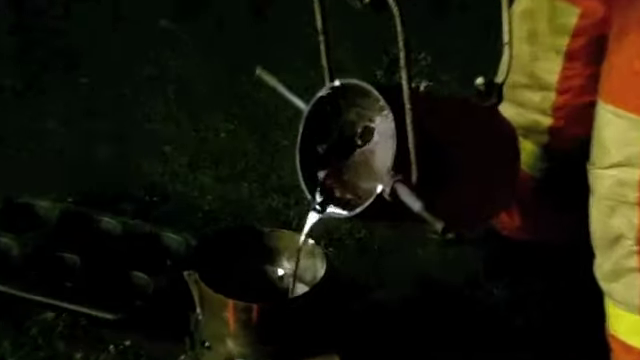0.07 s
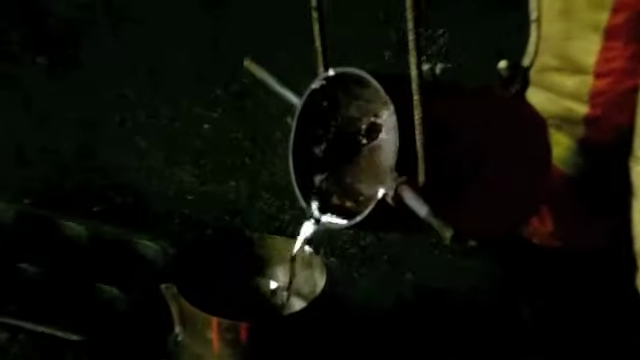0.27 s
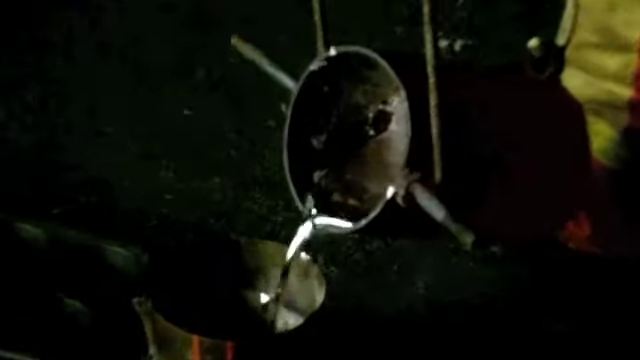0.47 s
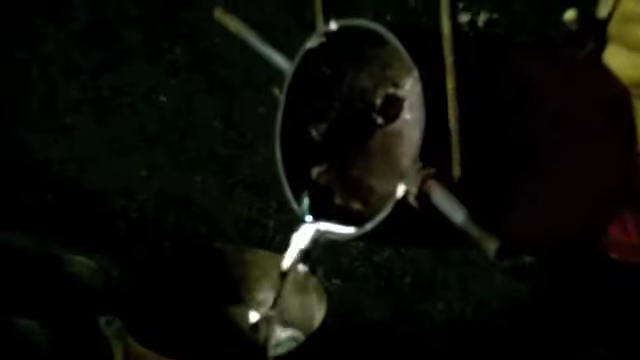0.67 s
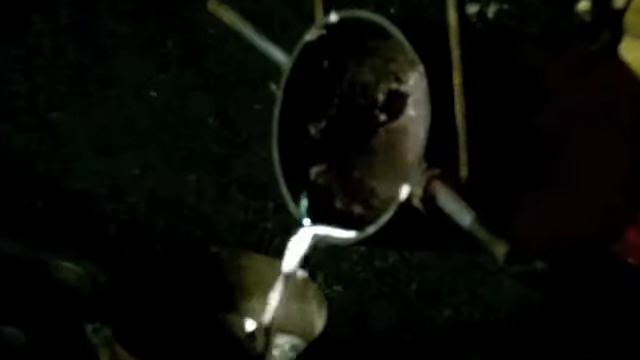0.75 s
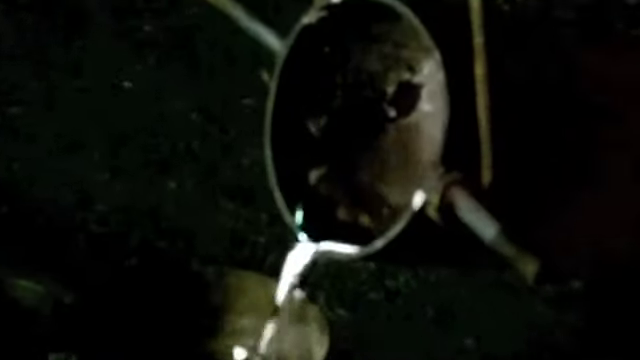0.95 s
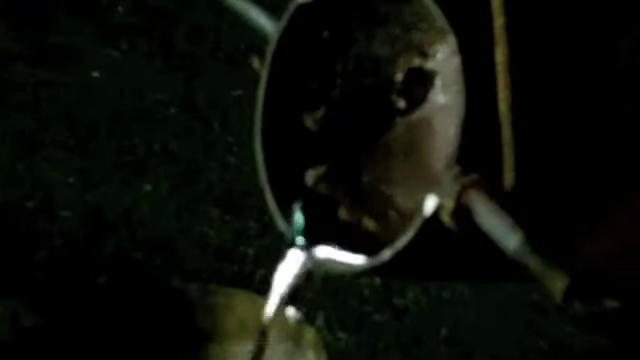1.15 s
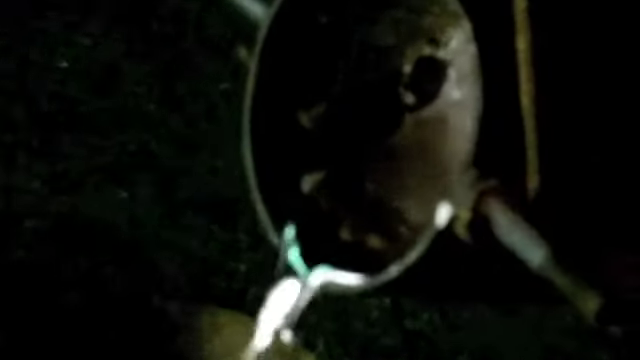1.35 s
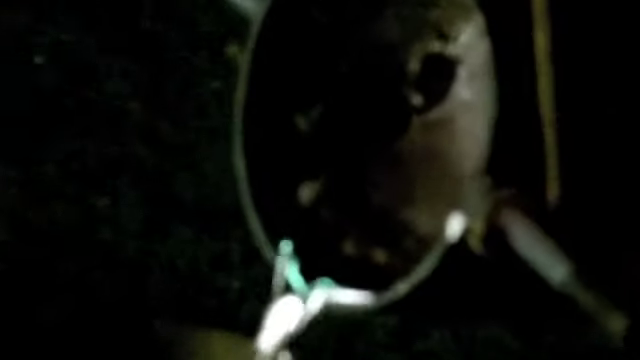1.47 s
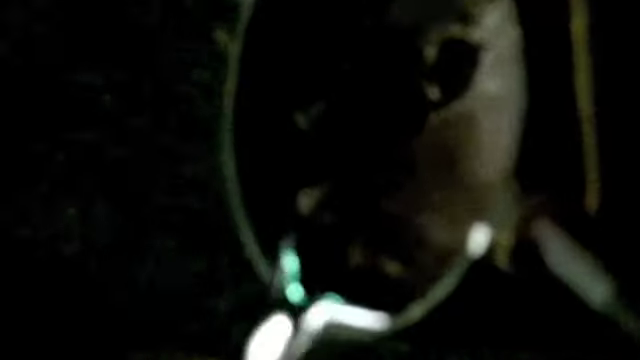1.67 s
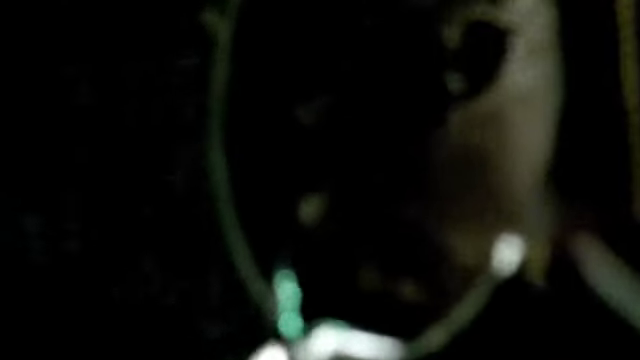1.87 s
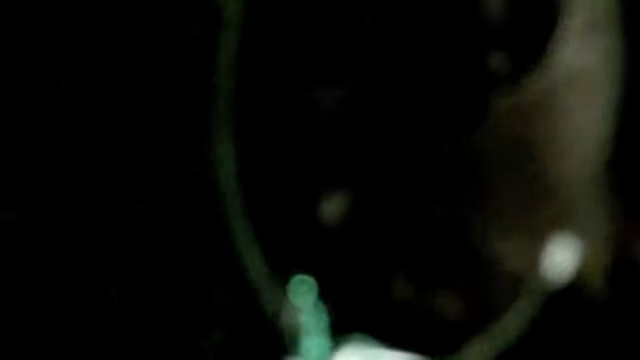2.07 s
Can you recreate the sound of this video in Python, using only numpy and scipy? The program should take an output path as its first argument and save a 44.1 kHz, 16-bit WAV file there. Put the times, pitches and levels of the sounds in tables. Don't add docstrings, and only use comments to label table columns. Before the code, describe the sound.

Molten metal pours with a dense, bright, steady hiss throughout, swelling slightly around 0.3 seconds and then easing. At about 0.2 to 0.3 seconds, tongs rattle quickly on the steel mould, leaving a short hollow mid-pitched note. Small ticks follow near 0.44, 0.5 and 0.63 to 0.7, then sparse spits and a plop around 1.5. Faint low stream wash and distant machine drone lie beneath, outdoors, in coloured mono.

```python
import sys
import numpy as np
from scipy import signal
from scipy.fft import rfft, irfft, next_fast_len
from scipy.io import wavfile
from scipy.ndimage import uniform_filter1d

SR = 44100
rng = np.random.default_rng(int(sys.argv[2]) if len(sys.argv) > 2 else 0)


def unload_audio(sound):
    columns = np.transpose(np.atleast_2d(sound))
    steps = np.round(np.clip(columns, -1, 1) * 32767)
    wavfile.write(sys.argv[1], SR, steps.astype(np.int16))


def boost_factor(decibels):
    exponent = np.asarray(decibels, float) / 20
    return 10 ** exponent


N = 92610

# centre in Hz, width in Hz, level in dB.
DRONE_BANDS = [(132.6, 5, -78.5), (203.5, 13, -76.5)]
# frequency in Hz, density in dB per Hz.
WASH_COLOUR = [(30, -34.5), (85, -42), (135, -7), (260, -5.5), (600, 1), (1400, -0.5), (1900, -4.5),
               (4000, -46)]
# frequency in Hz, level in dB, t60 in seconds.
HOLLOW_MODES = [(436, -41, .8), (415, -45, .7), (452, -49, .5)]
# frequency in Hz, level in dB, t60 in seconds.
MOULD_MODES = [(640, -4.5, 0.19), (639, -4.5, 0.091), (904, 6.5, 0.033), (1024, -3, 0.059),
               (1810, 4.5, 0.04), (1920, -9, 0.061), (2430, 0, 0.26), (3540, -6, 0.17), (4020, 0, 0.084),
               (4240, 4, 0.053), (4540, -20, 0.074), (4617, -16, 0.095), (4800, -2, 0.067)]
# start in seconds, crack in dB, crack centre in Hz, body ring in dB, bright ring in dB.
TONG_BLOWS = [
    (.186, -44, 2500, -60, -70),
    (.198, -41, 1500, -46, -70),
    (.205, -37, 3000, -50, -70),
    (.2160, -31, 2300, -36, -70),
    (.2385, -26, 4100, -40, -41),
    (.258, -40, 5200, -54, -54),
    (.271, -38, 1500, -50, -54),
    (.293, -44, 4200, -56, -52),
]
# start in seconds, peak
# in dB, pitch in Hz, t60 in seconds.
PING_EVENTS = [(.2005, -39, 600, .04), (.2020, -39, 990, .04), (.2035, -37, 2700, .012),
               (.2062, -30, 3850, .012), (.2100, -38, 3000, .012), (.2150, -62, 45, .12),
               (.2175, -31, 950, .06), (.2180, -26, 3750, .016), (.2185, -27, 1830, .025),
               (.2195, -27, 1930, .02), (.2300, -34, 930, .05), (.2375, -29, 1020, .04),
               (.2390, -23, 4200, .03), (.2405, -28, 2900, .014), (.2410, -31, 1900, .02),
               (.2425, -30, 5500, .014), (.2470, -35, 630, .08), (.2540, -34, 4650, .03),
               (.2740, -36, 4700, .035), (.4355, -37, 950, .014), (.4383, -36, 620, .012),
               (.4435, -40, 520, .014), (.4981, -31, 3200, .005), (.4984, -36, 4100, .006),
               (.4996, -36, 1350, .016), (.5003, -34, 620, .024), (.5010, -41, 1900, .012),
               (.5010, -47, 230, .05), (.5022, -38, 950, .02), (.6323, -24, 3300, .003),
               (.6323, -34, 9000, .003), (.6403, -34, 3200, .005), (.6498, -35, 8800, .004),
               (.6650, -43, 420, .03), (.6794, -33, 3100, .003), (.7051, -27, 3000, .003),
               (.7052, -34, 8000, .005), (.7064, -31, 4800, .003), (1.5182, -36, 640, .02),
               (1.5184, -35, 1050, .014), (1.5188, -39, 1500, .016), (1.5185, -45, 2700, .007),
               (1.5215, -44, 420, .025), (1.5968, -39, 1500, .013), (1.5968, -44, 3200, .006),
               (1.9505, -39, 2400, .004)]
# start in seconds, level in
# dB, centre in Hz, length in seconds, width in octaves.
SPIT_EVENTS = [(.2165, -35, 6900, .003, .1), (.2185, -33, 4700, .0055, .1), (.6862, -42, 7900, .006, .25),
               (.6865, -45, 3500, .005, .6), (.545, -43, 4500, .002, .5), (.664, -49, 450, .010, 1.2),
               (.985, -51, 1300, .006, .7), (1.213, -42, 3500, .001, 1.2), (1.230, -45, 6000, .002, .8),
               (1.265, -50, 900, .008, 1.1), (1.426, -46, 6000, .002, .8), (1.480, -46, 7000, .002, .6),
               (.186, -43, 1800, .030, .8), (.206, -42, 1600, .030, .8), (.245, -44, 1500, .030, .9),
               (.283, -50, 1500, .030, 1.0), (.300, -47, 4600, .030, .4), (.330, -49, 4300, .030, .4)]
# time in seconds, level in dB.
FIZZ_LEVEL = [
    (0.0, -42.5),
    (0.33, -40.5),
    (0.76, -43.5),
    (1.84, -45),
    (2.1, -45),
]
# frequency in Hz, density in dB per Hz.
FIZZ_COLOUR = [(1200, -20.5), (1900, -16), (2600, -5.5), (4000, -4.5), (5600, -3.5), (7600, -4), (9000, -5),
               (10200, -4)]
# start in seconds, length in seconds, low edge in Hz, high edge in Hz.
TREBLE_DROPOUTS = [
    (.211, .005, 4300, 6600),
    (.224, .012, 4000, 7200),
    (.617, .008, 8300, 10300),
    (.638, .005, 8300, 10300),
    (.652, .003, 6500, 10300),
    (.678, .006, 8000, 10300),
    (.710, .005, 6300, 9500),
]
# centre in Hz, width in Hz, lift in dB.
PORT_RESONANCES = [(3157, 460, 4), (4654, 430, 4.5), (6730, 240, 4), (2210, 240, 1.5)]


def evened(x):
    return x / np.sqrt(np.mean(x ** 2) + 1e-20)


def smoothed_twice(x, first, second):
    x = uniform_filter1d(x, size=first[0], axis=first[1])
    return uniform_filter1d(x, size=second[0], axis=second[1])


def add(mix, start_s, sound):
    part = mix[round(start_s * SR):][:len(sound)]
    part += sound[:len(part)]


def colour(x, points):
    size = next_fast_len(len(x))
    hz = np.fft.rfftfreq(size, 1 / SR)
    f, db = np.transpose(points)
    curve_db = np.interp(np.log(hz + 1), np.log(f + 1), db)
    return irfft(rfft(x, size) * boost_factor(curve_db), size)[:len(x)]


def patchy(x, patch_db, flicker_db):
    z = signal.stft(x, nperseg=256, noverlap=192)[2]
    a, b = rng.standard_normal((z.shape[1], z.shape[0], 2)).T
    patches = evened(smoothed_twice(a, (3, 0), (30, 1)))
    flicker = evened(smoothed_twice(b, (40, 0), (6, 1)))
    z = z * boost_factor(patch_db * patches + flicker_db * flicker)
    return evened(signal.istft(z, nperseg=256, noverlap=192)[1][:N])


def puff(centre_hz, length_s, octaves, top_hz=12000):
    t = np.arange(2048) / SR
    hz = np.fft.rfftfreq(2048, 1 / SR) + 1
    shape_db = -6 * (np.log2(hz / centre_hz) / octaves) ** 2
    shape_db = shape_db - 30 * np.clip((hz - top_hz) / 800, 0, 1)
    noise = evened(irfft(rfft(rng.standard_normal(2048)) * boost_factor(shape_db)))
    u = t / max(length_s, 1e-4)
    burst = noise * np.minimum(u / .3, 1) * np.exp(-np.maximum(u - .7, 0) / .3)
    return burst / np.linalg.norm(burst) * np.sqrt(0.56 * length_s * SR)


def drone():
    out, hz = np.zeros(N), np.fft.rfftfreq(N, 1 / SR)
    for centre_hz, width_hz, db in DRONE_BANDS:
        resonance = 1 + (2 * (hz - centre_hz) / width_hz) ** 2
        out += boost_factor(db) * evened(irfft(rfft(rng.standard_normal(N)) / resonance, N))
    return out


def wash():
    level_db = -54
    return boost_factor(level_db) * patchy(colour(rng.standard_normal(N), WASH_COLOUR), .9, 0.66)


def hollow():
    start_s, rise_s, hold_s, damp_s = .216, .009, .037, .155
    level_db, from_hz, to_hz, roughness = -26.5, 400, 441, .2
    out, t = np.zeros(N), np.arange(SR // 2) / SR
    hz = to_hz - (to_hz - from_hz) * np.exp(-t / .015)
    driven_db = level_db - 120 * t - 1300 * np.maximum(t - hold_s, 0)
    driven = boost_factor(driven_db) * np.sin(2 * np.pi * np.cumsum(hz) / SR)
    ring = np.zeros(len(t))
    for f, db, t60 in HOLLOW_MODES:
        ring += boost_factor(db - 60 * t / t60) * np.sin(2 * np.pi * f * (t - .05))
    ring = ring * np.minimum(t / .04, 1) * boost_factor(-500 * np.maximum(t - damp_s, 0))
    wobble = evened(smoothed_twice(rng.standard_normal(len(t)), (200, 0), (200, 0)))
    rattle = 1 + roughness * wobble
    add(out, start_s, np.minimum(t / rise_s, 1) * rattle * (driven + ring))
    return out


def mould_ring(t, body_db, bright_db):
    ring = np.zeros(len(t))
    lean_db, phase = rng.standard_normal((2, len(MOULD_MODES)))
    for k, (hz, db, t60) in enumerate(MOULD_MODES):
        blow_db = body_db if k < 6 else bright_db
        mode_db = db + blow_db + lean_db[k] - 60 * t / t60
        ring += boost_factor(mode_db) * np.sin(2 * np.pi * (hz * t + phase[k]))
    return np.minimum(t / 0.0011, 1) * ring


def knock():
    crack_s, crack_octaves, crack_top_hz = .0065, .65, 7200
    tail_db, tail_t60_s = -7, .45
    cracks, rings, t = np.zeros(N), np.zeros(N), np.arange(SR // 2) / SR
    for s, crack_db, centre_hz, body_db, bright_db in TONG_BLOWS:
        crack = puff(centre_hz, crack_s, crack_octaves, min(2 * centre_hz, crack_top_hz))
        add(cracks, s, boost_factor(crack_db) * crack)
        add(cracks, s, boost_factor(body_db - 3) * puff(750, .012, .6))
        add(rings, s, mould_ring(t, body_db, bright_db))
    tail = rng.standard_normal(len(t)) * boost_factor(-60 * t / tail_t60_s) * np.minimum(t / .015, 1)
    yard = signal.fftconvolve(cracks, tail / np.linalg.norm(tail))[:N]
    return cracks + rings + boost_factor(tail_db) * yard


def pings():
    out, t = np.zeros(N), np.arange(4096) / SR
    for s, db, hz, t60 in PING_EVENTS:
        envelope = boost_factor(db - 60 * t / t60) * np.minimum(2 * t * hz, 1)
        add(out, s, envelope * np.sin(2 * np.pi * hz * t))
    return out


def spits():
    out = np.zeros(N)
    for s, db, centre_hz, length_s, octaves in SPIT_EVENTS:
        add(out, s, boost_factor(db) * puff(centre_hz, length_s, octaves))
    return out


def fizz():
    bursts_per_s, spread_db, bursts_db = 2500, 3.5, -6.5
    sizes = boost_factor(spread_db * np.minimum(rng.exponential(1, N), 5))
    bursts = sizes * (rng.random(N) < bursts_per_s / SR)
    bursts = uniform_filter1d(bursts, size=8) * rng.standard_normal(N)
    x = rng.standard_normal(N) + boost_factor(bursts_db) * evened(bursts)
    s, db = np.transpose(FIZZ_LEVEL)
    level = boost_factor(np.interp(np.arange(N) / SR, s, db))
    return level * patchy(colour(x, FIZZ_COLOUR), 0.82, 0.7)


def scene():
    x = drone() + wash() + hollow() + knock() + pings() + spits() + fizz()
    return np.array([x, x])


def starve(x):
    dropout_db, gap_db, gaps_per_s = -18, -18, 80
    hz, t, z = signal.stft(x, SR, nperseg=128, noverlap=96)
    thin_db = np.zeros((len(hz), len(t)))
    for s, length_s, lo_hz, hi_hz in TREBLE_DROPOUTS:
        thin_db += dropout_db * np.outer((hz > lo_hz) & (hz < hi_hz), (t > s) & (t < s + length_s))
    for when, span, where, wide in rng.random((round(gaps_per_s * N / SR), 4)):
        s, lo_hz = when * N / SR, 4800 + 5000 * where
        band = (hz > lo_hz) & (hz < lo_hz + 600 + 700 * wide)
        moment = (t > s) & (t < s + .003 + .007 * span)
        thin_db[np.ix_(band, moment)] = gap_db
    return signal.istft(z * boost_factor(thin_db), SR, nperseg=128, noverlap=96)[1][:, :N]


def low_pass(x):
    return signal.sosfilt(signal.butter(12, 11300, fs=SR, output="sos"), x)


def record(dry):
    top_hz = 10150
    size = next_fast_len(N + 4096)
    hz = np.fft.rfftfreq(size, 1 / SR)
    lift_db = np.full(len(hz), 2.01)
    for f, width_hz, db in PORT_RESONANCES:
        lift_db += db / (1 + (2 * (hz - f) / width_hz) ** 2)
    edge = np.clip((top_hz - hz) / 200, 0, 1) * np.minimum(hz / 60, 1)
    x = irfft(rfft(starve(dry), size, axis=1) * boost_factor(lift_db) * edge, size, axis=1)[:, :N]
    return low_pass(x)


dry = scene()
out = record(dry)
unload_audio(out)
```